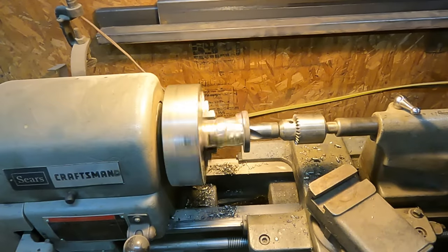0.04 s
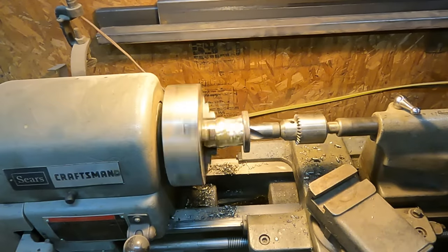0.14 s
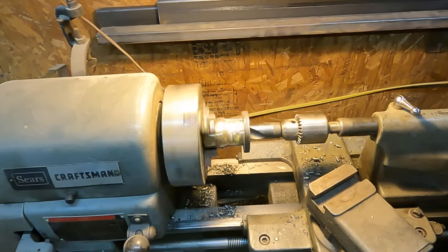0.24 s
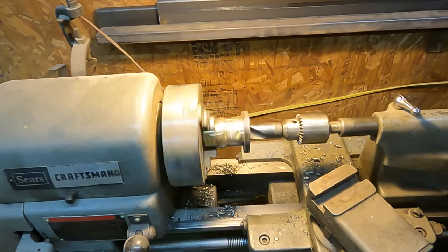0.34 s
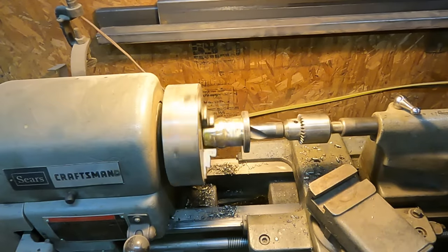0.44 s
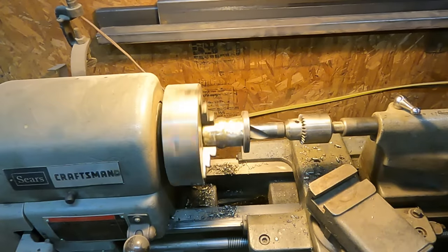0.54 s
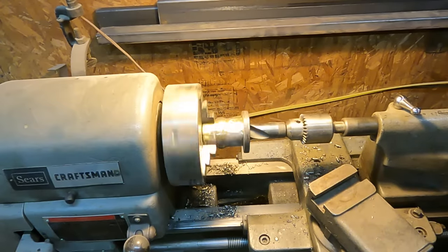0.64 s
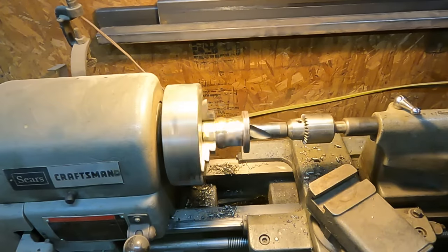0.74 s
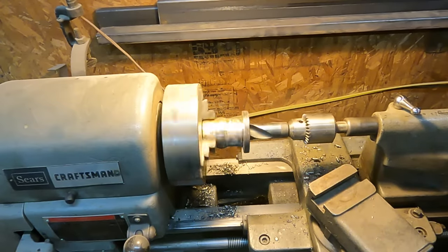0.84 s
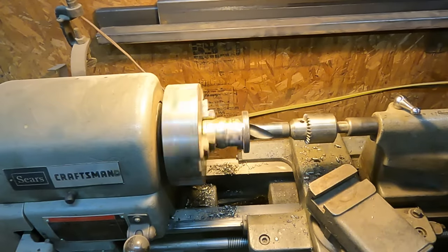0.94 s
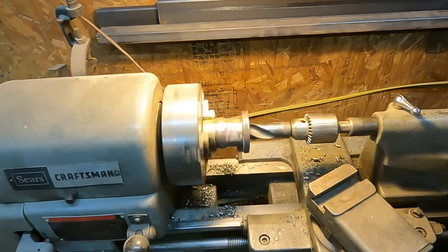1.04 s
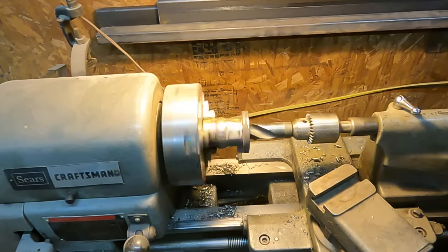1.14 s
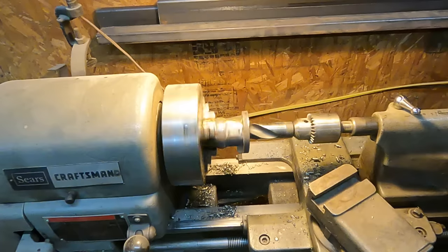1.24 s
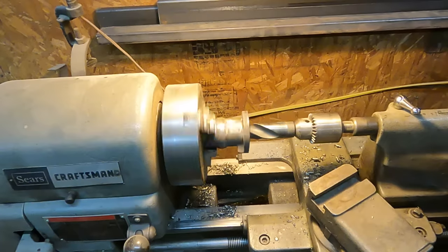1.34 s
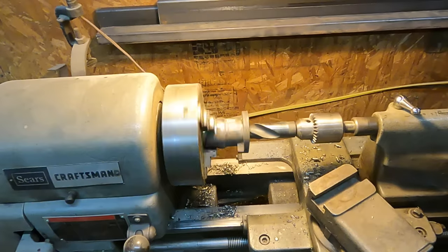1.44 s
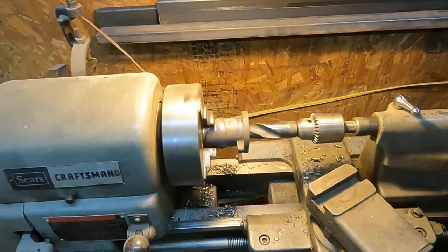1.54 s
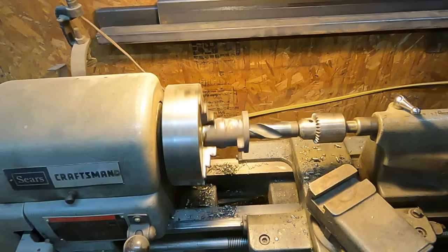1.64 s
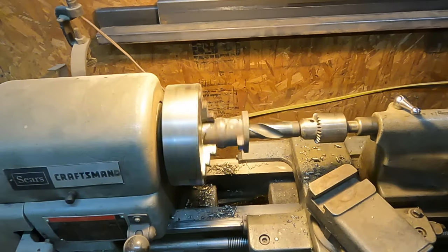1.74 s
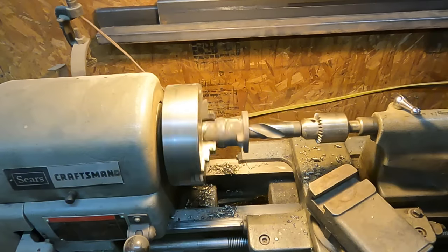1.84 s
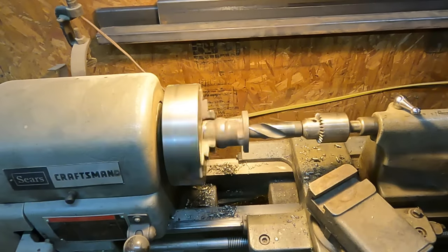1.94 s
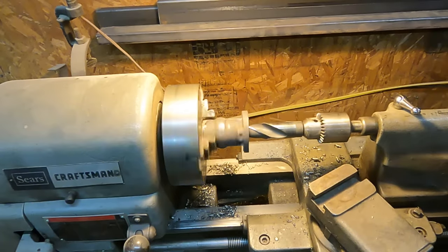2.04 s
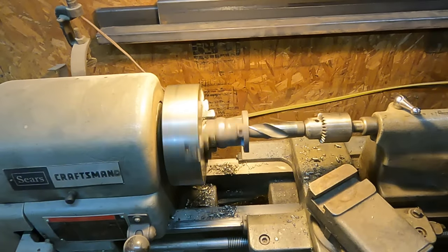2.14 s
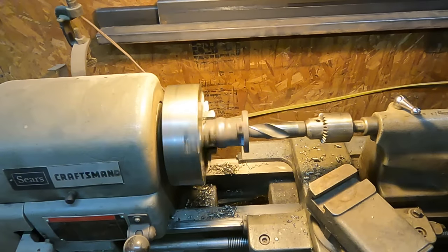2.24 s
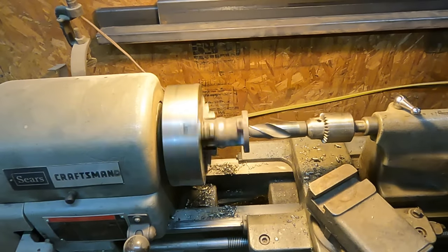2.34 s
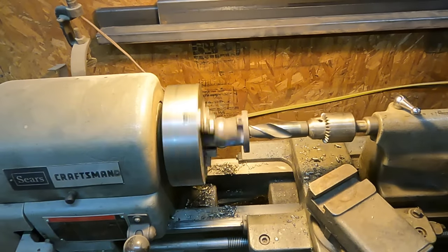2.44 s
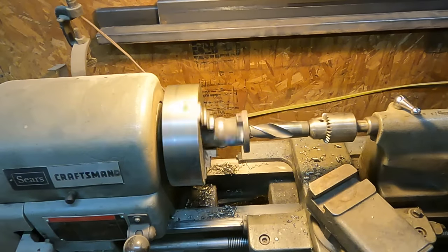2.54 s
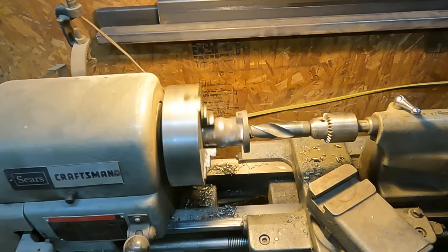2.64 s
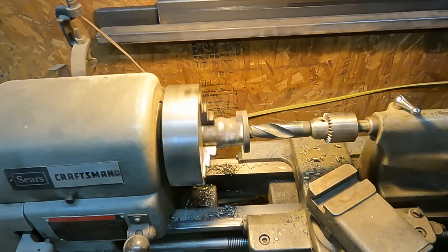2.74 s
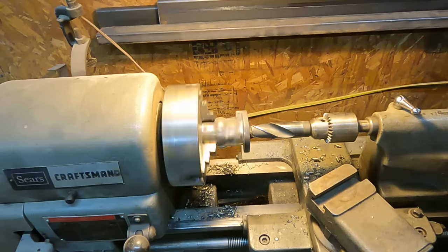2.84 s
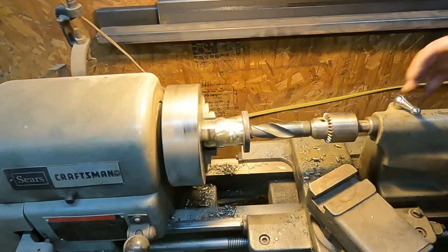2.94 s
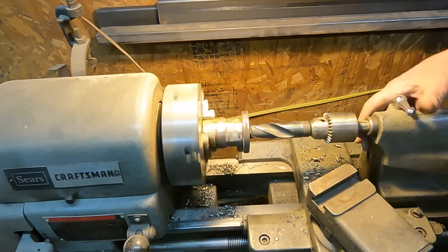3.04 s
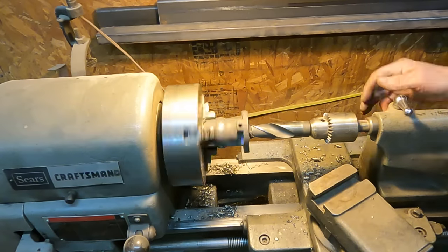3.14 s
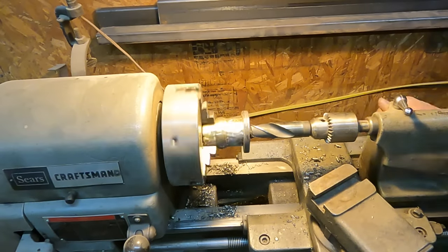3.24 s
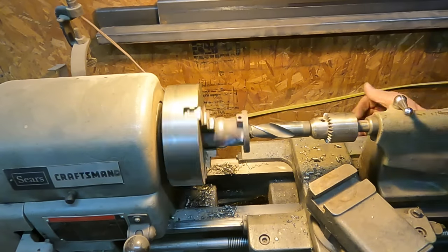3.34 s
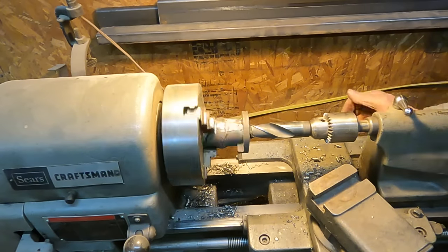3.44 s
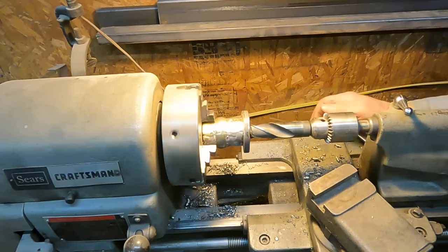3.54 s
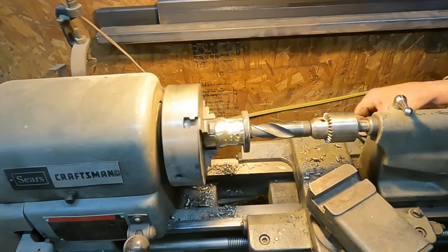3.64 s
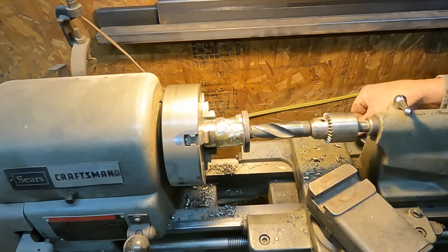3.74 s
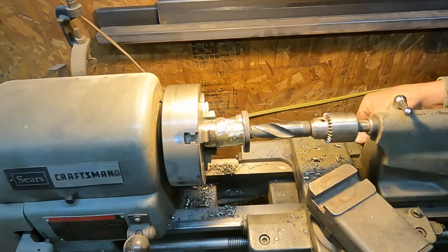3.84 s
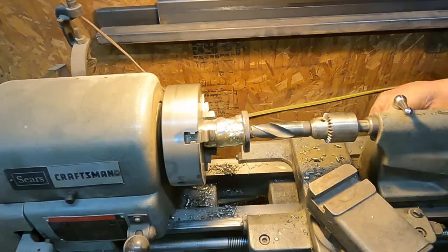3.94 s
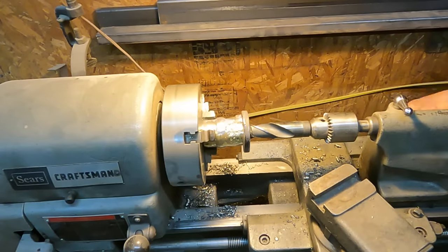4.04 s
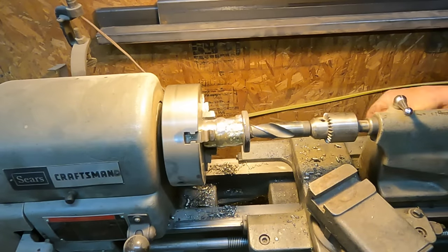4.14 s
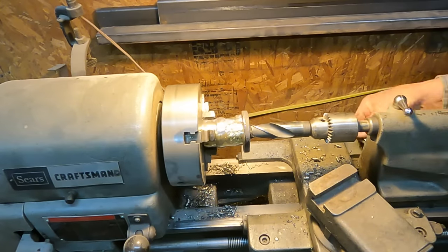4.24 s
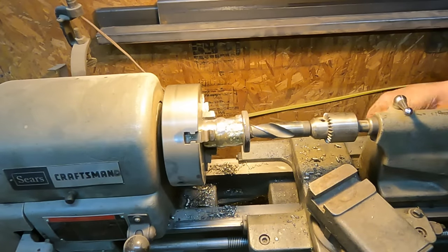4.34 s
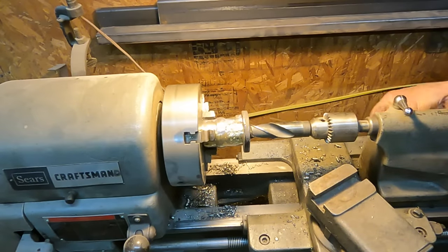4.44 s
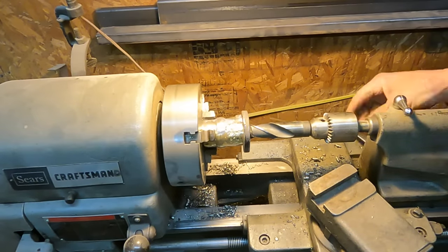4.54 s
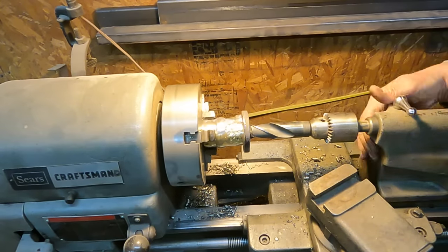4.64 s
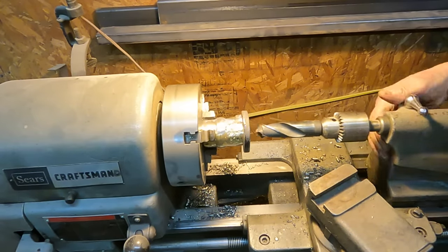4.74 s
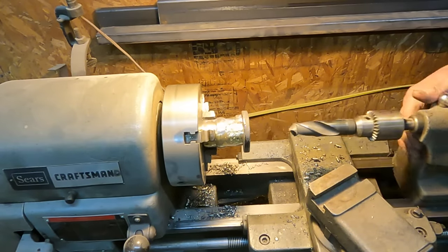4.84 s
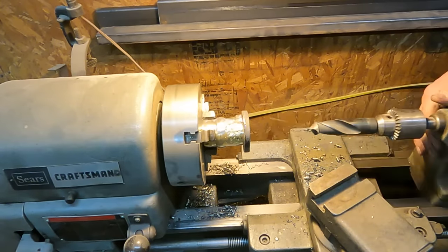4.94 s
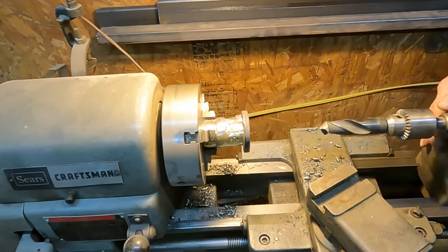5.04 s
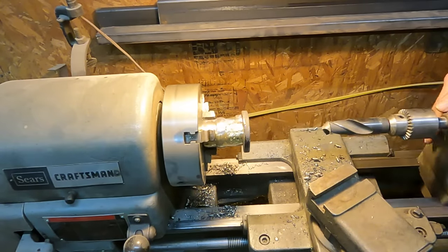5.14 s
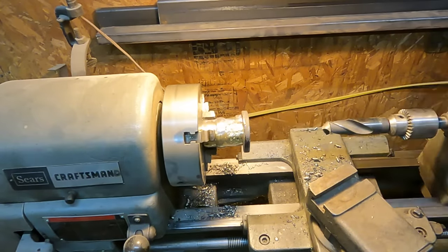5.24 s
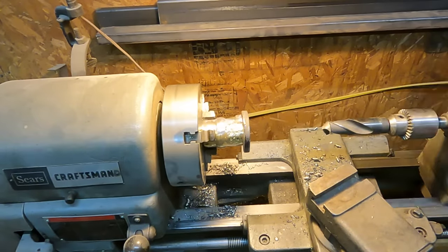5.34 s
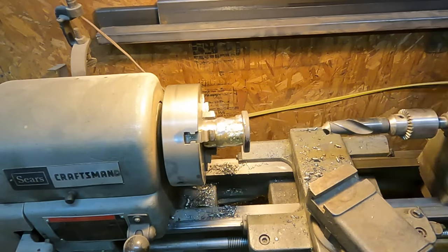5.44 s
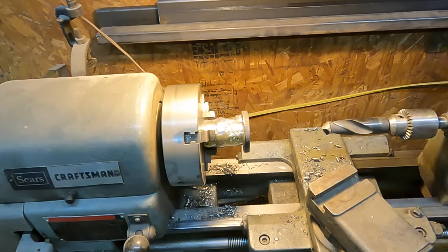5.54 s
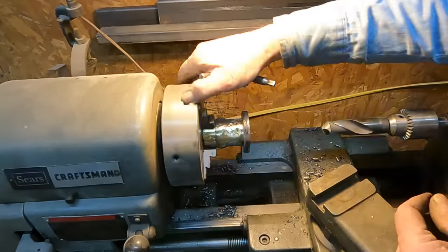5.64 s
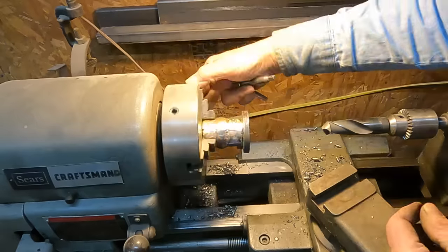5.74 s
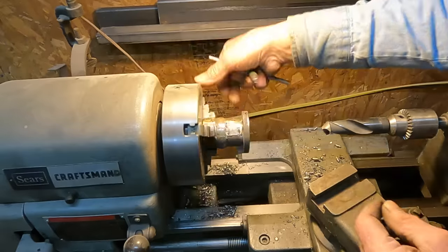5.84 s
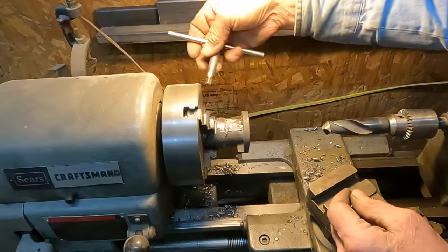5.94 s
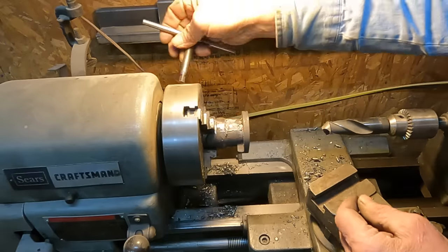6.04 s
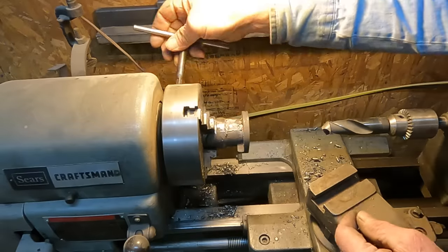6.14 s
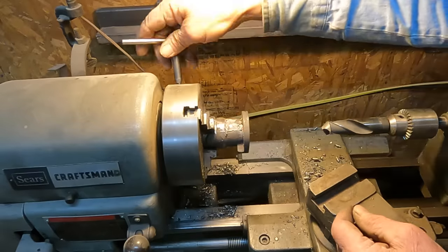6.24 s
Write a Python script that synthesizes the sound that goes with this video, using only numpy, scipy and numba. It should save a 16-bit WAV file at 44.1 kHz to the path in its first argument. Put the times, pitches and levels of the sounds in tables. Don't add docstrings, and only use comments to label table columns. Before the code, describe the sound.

Close mono sound of a lathe: brief high drill squeals, then regular scraping ticks and hissing metal chips over motor hum and low gear rumble. Switching off brings a heavy clunk and a softer belt clunk, with the iron bed ringing as the machine coasts down. Irregular bright crank clicks follow, then a quiet dry rub, faint bumps and a small cluster of key knocks, with a short workshop echo.

```python
import sys
import numpy as np
from scipy import signal
from scipy.fft import rfft, irfft, next_fast_len
from scipy.io import wavfile
from scipy.ndimage import uniform_filter1d
from numba import njit

SR = 44100
rng = np.random.default_rng(int(sys.argv[2]) if len(sys.argv) > 2 else 0)


def volts_from_decibels(level):
    exponent = np.asarray(level, float) / 20
    return 10 ** exponent


def to_wav(s):
    ch = np.atleast_2d(s).T
    pcm = np.round(np.clip(ch, -1, 1) * 32767)
    wavfile.write(sys.argv[1], SR, pcm.astype(np.int16))


N = 278271
TIME = np.arange(N) / SR
SWITCH_S = 2.883


def unit(x):
    return x / np.sqrt(np.mean(x ** 2))


def smooth(x, size):
    return uniform_filter1d(uniform_filter1d(x, size), size)


def colour(x, spectrum, peaks=()):
    size = next_fast_len(len(x))
    hz = np.maximum(np.arange(size // 2 + 1) * SR / size, 1)
    points = np.array(spectrum)
    db = np.interp(np.log(hz), np.log(points[:, 0]), points[:, 1], -90, -90)
    for centre, width, top in peaks:
        db += top / (1 + (2 * (hz - centre) / width) ** 2)
    return unit(irfft(rfft(x, size) * volts_from_decibels(db), size)[:len(x)])


def passband(x, kind, hz, order=2):
    return signal.sosfilt(signal.butter(order, hz, kind, fs=SR, output="sos"), x)


def walk(rate_hz):
    hold = int(SR / rate_hz)
    goals = np.repeat(rng.standard_normal(N // hold + 1), hold)
    return unit(smooth(goals, hold)[:N])


def grit(spread_db):
    return rng.standard_normal(N) * volts_from_decibels(spread_db * np.minimum(rng.exponential(size=N), 5))


def add(out, s, sound):
    i = int(s * SR)
    out[i:i + len(sound)] += sound[:N - i]


def fade(t, t60):
    return np.exp(-np.log(1000) * t / t60)


def ring(t, hz, t60):
    return np.sin(2 * np.pi * hz * t) * fade(t, t60)


# start_s, length_s, first_pitch_hz, last_pitch_hz, level_db
SQUEAKS = [(0.0253, 0.0045, 5300, 5250, -11), (.030, 0.0031, 5600, 5700, -11),
           (0.0331, 0.0022, 4700, 5100, -5.5), (.0345, 0.0066, 5680, 5870, 9.5),
           (0.126, 0.0075, 5200, 4900, -14), (0.131, 0.0088, 4470, 4530, -8),
           (0.136, 0.0067, 4680, 5670, 10), (0.1962, 0.0066, 5920, 4170, -3),
           (0.2017, 0.009, 4300, 4180, -9), (0.228, 0.0086, 4500, 4200, -13.5),
           (0.231, 0.0074, 4260, 3870, -10), (0.2378, 0.0059, 4730, 5280, -3),
           (0.2396, 0.012, 5560, 5730, 10), (.335, 0.0051, 5450, 3810, -16),
           (0.3437, 0.01, 5510, 5770, 7.5), (0.351, 0.0048, 5750, 5220, -5), (0.451, 0.004, 6800, 6160, 1),
           (0.453, 0.0075, 6280, 6300, -9), (0.541, 0.0053, 4600, 3550, -19)]


def squeaks():
    out = np.zeros(N)
    for s, length, first_hz, last_hz, db in SQUEAKS:
        u = np.linspace(0, 1, int(length * SR))
        pitch_shake, level_shake = uniform_filter1d(rng.standard_normal((2, 600)), 50)[:, :len(u)]
        hiss = rng.standard_normal(len(u))
        hz = first_hz + (last_hz - first_hz) * (1 - (1 - u) ** 3)
        octave = volts_from_decibels(8.5 - 18 * np.abs(hz - 4804) / 1000)
        phase = 2 * np.pi * np.cumsum(hz * (1 + 0.13 * (pitch_shake - pitch_shake.mean()))) / SR
        phase += (0.39 if last_hz < first_hz else 0.12) * unit(smooth(hiss, 34))
        rise = np.sin(np.pi / 2 * np.minimum(u / 0.4, 1))
        stop = np.sin(np.pi / 2 * np.minimum((1 - u) / 0.25, 1))
        shape = (rise * stop) ** 1.2 * (1 + 0.72 * level_shake) * np.exp(-0.6 * u)
        if last_hz < first_hz - 200:
            shape *= 1 + 0.9 * smooth(hiss, 12)
        third = 0.21 * (last_hz < 4800) * np.sin(3 * phase)
        overtones = octave * (np.sin(2 * phase) + third + 0.011 * hiss)
        add(out, s, volts_from_decibels(db) * shape * (np.sin(phase) + overtones))
    return out


# pitch_hz, level_db (per Hz)
CUTTING_HISS = [(820, -9), (1400, 0.5), (1590, -10), (4070, -13.5), (4760, -15.5), (5390, -14),
                (9530, -21.5), (15200, -27.5), (16200, -53.5), (16700, -87.5)]
# start_s, level_db
TICKS = [(0.632, -25.5), (0.726, -30), (0.7737, -21), (0.846, -20), (0.945, -19.5), (1.0497, -15.5),
         (1.1543, -9.5), (1.2568, -10), (1.361, -7), (1.4642, -12.5), (1.5647, -17.5), (1.668, -35),
         (1.7847, -20), (1.889, -19.5), (1.993, -19.5), (2.0875, -18.5), (2.19, -23), (2.2916, -23),
         (2.503, -32), (2.6437, -44), (2.6906, -49), (2.732, -29), (2.936, -40)]


def ticks():
    out, t = np.zeros(N), np.arange(2048) / SR
    for s, db in TICKS:
        bumps = [(4200, 1200, 10), (5300, 900, 10 + 0.9 * db), (8800, 2000, 17.5 + 0.55 * db),
                 (13000, 7000, 4 + 0.6 * db)]
        scrape = colour(rng.standard_normal(len(t)), CUTTING_HISS, bumps)
        scrape *= (1 - np.exp(-t / 0.0006)) * (np.exp(-t / 0.0028) + 0.16 * np.exp(-t / 0.015))
        scrape = passband(scrape, "high", 1700)
        add(out, s - 0.001, volts_from_decibels(db + 1.5) * scrape)
        add(out, s + 0.029, volts_from_decibels(0.41 * db - 20) * scrape)
    return out


# start_s, level_db, pitch_hz, length_s
SWARF = [(0.642, -34, 3600, 0.01), (0.744, -35, 3950, 0.011), (0.843, -35, 4200, .012),
         (0.976, -29, 3000, .012), (1.083, -27.5, 3300, 0.011), (1.183, -23, 2870, 0.01),
         (1.262, -18, 2660, 0.0073), (1.286, -29, 3150, .015), (1.387, -28, 4300, .008),
         (1.469, -16, 2900, 0.0057), (1.4932, -20, 2800, 0.0092), (1.575, -28, 4000, .015),
         (1.596, -22, 2970, .008), (1.672, -33, 4000, .02), (1.698, -24, 2900, 0.0073),
         (1.798, -24, 2900, 0.013), (1.902, -30, 2900, 0.0093), (1.921, -29, 3300, .008),
         (2.001, -18, 2970, .006), (2.095, -27, 3800, .012), (2.206, -24.5, 2680, .012),
         (2.3, -28, 3250, 0.021), (2.33, -28, 3480, .008), (2.397, -33, 4000, 0.011),
         (2.431, -28.5, 2800, 0.0096), (2.51, -34, 3800, .02)]


def swarf():
    out, t = np.zeros(N), np.arange(4096) / SR
    width = 0.41
    for s, db, hz, length in SWARF:
        noise = rng.standard_normal(len(t)) * volts_from_decibels(1.96 * rng.exponential(size=len(t)))
        scrape = unit(passband(noise, "band", [hz * (1 - width / 2), hz * (1 + width)]))
        add(out, s - 0.002, volts_from_decibels(db) * scrape * (1 - np.exp(-t / 0.0013)) * np.exp(-t / length))
    return out


# pitch_hz, width_hz, level_db
BRIGHT = [(2400, 2500, 2.5), (4200, 250, 3.5), (5300, 64, 9.5), (7250, 630, 6), (9380, 1900, 5.5),
          (11300, 390, 2.5)]


def chips(load):
    hiss = colour(grit(3.6), CUTTING_HISS, BRIGHT) * volts_from_decibels(1.1 * walk(29.93))
    turn_s, catch_s = 0.1032, 1.352
    bite = np.exp(-((TIME - catch_s) / turn_s % 1) / 0.44)
    hiss *= volts_from_decibels(3 * (bite - bite.mean()))
    breaks = (rng.random(N) < 700 * bite / SR) * rng.standard_normal(N)
    breaks = signal.lfilter([1], [1, -0.992], np.abs(breaks)) * rng.standard_normal(N)
    breaks = colour(breaks, CUTTING_HISS, [(4000, 1500, 17), (2400, 1500, 3.8)])
    hiss += 0.65 * volts_from_decibels(-18 * np.maximum(TIME - 1.1, 0)) * breaks
    pause = np.zeros(N)
    for s, length, _, _, db in SQUEAKS:
        if db > 3:
            pause += (TIME > s) * np.exp(-np.abs(TIME - s - length) / 0.026)
    return hiss * volts_from_decibels(-16.5 * pause - 31.5 + 0.79 * load)


# multiple of the mains pitch, level_db
HUM_LINES = [(4, -40), (8, -34.5), (12, -34), (13, -39.5), (16, -26), (18, -39), (21, -40.5), (23, -43),
             (24, -42), (28, -53)]


def hum(load):
    mains_hz = 59.97
    belt_s, joint_s = 0.611, 1.379
    from_joint = (TIME - joint_s + belt_s / 2) % belt_s - belt_s / 2
    db = -26 + 0.96 * load - 1 * np.exp(-(from_joint / 0.041) ** 2)
    main = volts_from_decibels(db - 337 * np.maximum(TIME - SWITCH_S, 0))
    slow = uniform_filter1d(main, SR // 4)
    top = max(line_db for _, line_db in HUM_LINES)
    out = np.zeros(N)
    for multiple, line_db in HUM_LINES:
        phase = 2 * np.pi * (multiple * mains_hz * TIME + 0.027 * walk(22) + rng.random())
        strength = main * volts_from_decibels(1.3 * walk(10)) if line_db == top else slow * volts_from_decibels(walk(3.7))
        out += np.sqrt(2) * volts_from_decibels(line_db - top + 1) * strength * np.sin(phase)
    return out


# pitch_hz, level_db (per Hz)
RUMBLE = [(24, -87), (40, -33), (91, -41), (184, -15.5), (233, -18), (425, -13.5), (486, -6), (658, -3),
          (715, -2.5), (804, -4), (951, -1), (1570, -17), (2200, -17.5), (2860, -42), (4840, -120)]
# pitch_hz, width_hz, level_db
CASTING = [(248, 11, 1), (311.4, 76, 17.5), (381.7, 28, 12.5), (523.7, 78, 12), (1074, 190, 9)]


def gears(load):
    rumble = colour(grit(3), RUMBLE, CASTING) * volts_from_decibels(0.9 * walk(40))
    low = passband(rumble, "low", 830)
    rumble = low + (rumble - low) * volts_from_decibels(-19 * np.maximum(TIME - SWITCH_S, 0))
    return rumble * volts_from_decibels(-24 + load)


# start_s, level_db (of gear rumble)
LOAD = [(0.0, -23.5), (0.32, -33.5), (0.45, -35), (0.66, -33.5), (0.79, -31.5), (1.11, -26.5), (1.4, -24),
        (2.2, -23), (2.72, -24.5), (2.87, -24), (3.0, -27.5), (3.14, -21.5), (3.22, -32.5), (3.53, -33),
        (3.76, -52.5), (3.85, -52.5), (3.96, -62)]


def motor():
    s, db = np.array(LOAD).T
    load = np.interp(TIME, s, db, -150, -150) + 24
    return hum(load) + gears(load) + chips(load)


# peak_s, level_db, rise_s, fall_s, treble_db
CLUNKS = [
    (3.119, -12.5, 0.021, 0.017, -4.5),
    (3.134, -18.5, 0.0038, 0.045, -31),
    (3.306, -24, 0.0047, 0.06, -7.5),
    (5.73, -42, 0.0088, 0.042, -45),
    (5.83, -43, 0.011, 0.024, -35),
]
# pitch_hz, level_db, decay_s (by 60 dB)
BED = [(249.6, -19, 1.24), (293, -40, .6), (381, -27, .6), (620, -18, 0.2), (1040, -15, 0.31),
       (1270, -42, 0.18)]


def clunks():
    low, high = colour(grit(0.29), RUMBLE, CASTING), colour(grit(4.3), CUTTING_HISS, BRIGHT)
    out = np.zeros(N)
    for s, db, rise, fall, treble_db in CLUNKS:
        shape = np.exp(np.where(TIME < s, (TIME - s) / rise, (s - TIME) / fall))
        out += volts_from_decibels(db) * shape * (low + volts_from_decibels(treble_db) * high)
    t = TIME[:SR // 2]
    bent = t + 18 / BED[0][0] * 0.11 * (1 - np.exp(-t / 0.11))
    bed = sum(volts_from_decibels(db) * ring(bent, hz, t60) for hz, db, t60 in BED)
    bed *= (1 - np.exp(-t / 0.0049)) / (1 + (t / 0.35) ** 12) * volts_from_decibels(2 * walk(25)[:len(t)])
    add(out, CLUNKS[0][0] - 0.018, bed)
    return out


# pitch_hz, level_db (per Hz)
SHOP = [(24, -83), (40, -44.5), (129, -24), (175, -38.5), (325, -0.5), (425, -12), (538, -2), (1070, -12),
        (1830, -26.5), (2200, -24), (2860, -63), (4840, -120)]


def knocks(table, crack_spectrum, modes=(), ring_cycles=200, tail=0.018, snap=0.29, crack_s=0.0057):
    out, t = np.zeros(N), np.arange(8192) / SR
    for s, db, hz, ring_db, thud_db in table:
        crack_noise, flutter_noise, thud_noise = rng.standard_normal((3, len(t)))
        body = np.exp(-t / crack_s / volts_from_decibels(0.16 * ring_db))
        crack_shape = snap * np.exp(-t / 0.00027) + body + tail * np.exp(-t / 0.015)
        crack = colour(crack_noise, crack_spectrum) * crack_shape
        push_s = 1 / SR
        if modes:
            hz = min((mode[0] for mode in modes), key=lambda mode_hz: abs(mode_hz - hz))
            push_s = 0.003 * np.clip((-19 - db) / 3, 0.01, 1)
        push = 1 - np.exp(-(t + 1 / SR) / push_s)
        flutter = 1 + (1.24 if hz < 6600 else 0.6) * unit(uniform_filter1d(flutter_noise, 70))
        own = flutter * ring(t, hz, ring_cycles / hz * (hz / 5000) ** 1.7)
        part = np.zeros(len(t))
        for mode_hz, mode_db, t60 in modes:
            level_shift, pitch_shift = rng.standard_normal(2)
            part += volts_from_decibels(mode_db + 3.9 * level_shift) * ring(t, mode_hz * (1 + 0.00071 * pitch_shift), t60)
        thud = colour(thud_noise, SHOP, [(1354, 610, 17), (642, 180, 3.2)])
        thud *= (t / 0.013) * np.exp(1 - t / 0.014)
        blow = 0.36 * crack + volts_from_decibels(ring_db) * own + flutter * part + volts_from_decibels(thud_db - db - 12) * thud
        add(out, s, volts_from_decibels(db) * push * blow)
    return out


# start_s, level_db, ring_pitch_hz, ring_db, thud_db
CRANK = [(3.5933, -4.5, 14570, -12, -45), (3.6099, -10, 11150, -0.5, -30), (3.627, -11.5, 7340, -10.5, -34),
         (3.7456, -9, 11100, -15, -32), (3.882, -36, 4510, -14, -48), (3.91, -41, 11100, -7, -44),
         (3.9645, -34, 4540, 4, -60), (3.9739, -6.5, 10680, -9.5, -44), (3.9826, -19, 10700, -18, -37.5),
         (4.0498, -21, 11300, -34, -47), (4.0862, -19, 11100, -27, -55), (4.1004, -10.5, 10680, -27, -30),
         (4.2466, -4, 14000, -10, -30), (4.2542, -6.5, 4630, -29, -31.5), (4.3312, -4.5, 10680, -10, -35),
         (4.39, -18, 13950, -30, -36.5), (4.5158, -23, 4240, -19, -32.5), (4.523, -20.5, 4430, -7.5, -35),
         (4.5693, -2.5, 11170, -4.5, -42), (4.5788, -6.5, 14570, -20, -31)]
# pitch_hz, level_db (per Hz)
CRANK_CRACK = [(530, -43.5), (900, -16.5), (3090, -7.5), (3490, -9), (4570, -1.5), (8830, -6.5),
               (11000, -1), (12400, -10), (14400, -17), (16700, -49)]
HANDLE_HZ = [1390, 4480, 5400, 6900, 7250, 7700, 10680, 11150, 13950, 14570]
# level_db, decay_s (by 60 dB)
HANDLE = [(-28, 0.099), (-21, 0.045), (-42, 0.043), (-20.5, 0.039), (-24, 0.036), (-26, 0.032), (-48, 0.12),
          (-41, 0.061), (-31, 0.056), (-37, 0.036)]


def crank():
    modes = [(hz, db, t60) for hz, (db, t60) in zip(HANDLE_HZ, HANDLE)]
    return knocks(CRANK, CRANK_CRACK, modes)


# start_s, level_db, ring_pitch_hz
TAPS = [(0.07, -21.5, 5730), (0.1097, -21, 5570), (3.353, -19, 4070), (3.468, -37, 5640),
        (3.491, -34, 7250), (3.693, -37, 2930), (4.411, -40, 2340), (4.4514, -36, 2400), (4.47, -44, 4500),
        (5.1136, -42.5, 7020), (5.249, -67, 6760)]
# pitch_hz, level_db (per Hz)
TAP_CRACK = [(880, -57), (1500, -16.5), (3320, -7.5), (4320, 2), (4930, -44), (5500, -8), (6150, -10.5),
             (14600, -23), (16700, -59)]


def taps():
    table = [(s, db, hz, -8, -40 + 0.25 * (db + 30)) for s, db, hz in TAPS]
    return knocks(table, TAP_CRACK, ring_cycles=220, tail=0.93, snap=0.05, crack_s=0.0063)


# start_s, level_db, ring_pitch_hz, ring_db, thud_db
KEY = [
    (6.0452, -10.5, 4000, -18, -32),
    (6.0518, -26, 3440, -11, -49),
    (6.1173, -20.5, 3760, -6.5, -26.5),
    (6.1235, -10, 3600, -23, -44),
    (6.1385, -27, 2950, -6, -49),
    (6.2092, -19, 3920, -12, -28),
    (6.2213, -27.5, 3860, -6, -47),
    (6.2887, -36, 4720, -8, -46),
    (6.2935, -34.5, 3530, 2.5, -26),
]
# pitch_hz, level_db (per Hz)
KEY_CRACK = [(530, -28), (900, -12), (1450, -35), (2220, -53), (2700, -2), (3760, -2), (5900, -4.5),
             (7270, 0), (11000, -3), (14900, 0), (16700, -3)]


def chuck_key():
    return knocks(KEY, KEY_CRACK, ring_cycles=110, tail=0.13, snap=0.68, crack_s=0.0046)


# start_s, pitch_hz, level_db,
# decay_s (by 60 dB)
PINGS = [(3.353, 4480, -18, 0.035), (3.353, 4200, -35, 0.5), (3.352, 5530, -23, 0.041),
         (3.353, 7250, -25, .04), (3.466, 5600, -36, 0.046), (3.466, 7250, -31, .04),
         (3.488, 5620, -36, .04), (3.489, 7250, -34, .08), (3.595, 2960, -19, 0.025),
         (3.612, 4540, -23, .05), (3.625, 1890, -23, 0.047), (3.746, 3010, -25, 0.028),
         (3.746, 4500, -27, .04), (3.909, 3050, -47, .06), (3.914, 2500, -47, 0.087),
         (3.973, 1920, -21, 0.029), (3.977, 1463, -39, 0.42), (3.978, 3760, -38, 0.14),
         (4.049, 3060, -36, .03), (4.086, 4600, -38, .03), (4.086, 3100, -36, .03),
         (4.099, 1110, -25.5, 0.039), (4.102, 1393, -42, 0.38), (4.12, 4450, -42, .15),
         (4.247, 3090, -22, 0.052), (4.248, 4670, -23, 0.051), (4.25, 1400, -40, 0.26),
         (4.331, 4460, -10, 0.038), (4.332, 3020, -27, 0.031), (4.333, 2010, -28, 0.049),
         (4.41, 2320, -29, 0.037), (4.411, 3500, -31, .03), (4.416, 4470, -39, 0.14),
         (4.451, 2350, -28.5, 0.028), (4.451, 3450, -30.5, .03), (4.524, 4460, -31, 0.05),
         (4.57, 3080, -22, 0.061), (4.571, 5400, -17.5, 0.061), (4.578, 4680, -21, 0.059),
         (4.58, 1150, -28, 0.067), (4.589, 506, -34, .1), (3.595, 11150, -16, 0.1),
         (3.594, 14300, -20, .09), (4.248, 14030, -20, 0.11), (4.248, 11150, -25, 0.11),
         (4.333, 11200, -23, 0.099), (4.391, 14100, -47, 0.12), (4.569, 11150, -28, 0.1),
         (4.57, 14570, -29, 0.11), (4.57, 14100, -25, .12),
         (6.046, 3650, -28.5, .05), (6.046, 9000, -33, .015), (6.055, 648, -29, 0.058),
               (6.118, 3520, -28, 0.065), (6.118, 9400, -32, 0.014), (6.127, 620, -43, 0.089),
               (6.128, 1473, -39, 0.12), (6.138, 3000, -46, .07), (6.194, 3700, -42, 0.072),
               (6.21, 3740, -24.5, 0.042), (6.21, 4800, -29, 0.036), (6.22, 7140, -23, .015),
               (6.224, 568, -25.5, 0.064), (6.293, 2670, -36, .05), (6.294, 1160, -33, .06),
               (6.298, 620, -29, .1), (6.302, 3740, -37.5, .04),
         (2.872, 870, -19, 0.085), (2.949, 295, -21, 0.17), (3.01, 290, -23, 0.17),
                 (3.125, 1458, -22, .25), (3.17, 584, -20, 0.24), (3.21, 378.3, -27.5, 0.97),
                 (3.3, 1074, -23.5, 0.31), (3.3, 910, -23, 0.11), (3.305, 328, -22.5, 0.34),
                 (3.975, 10680, -32, 0.16), (4.101, 10680, -36, 0.11), (4.333, 14000, -33, .12),
                 (3.519, 527, -31, 0.21), (5.607, 304, -40, 0.12), (5.655, 310, -48, .08),
                 (5.725, 334, -40, .15), (5.74, 537, -33, 0.1), (5.82, 542, -33.5, .1),
                 (5.839, 290, -48, .08)]


def pings():
    out, t = np.zeros(N), np.arange(16384) / SR
    for s, hz, db, t60 in PINGS:
        beat, wander = smooth(rng.standard_normal((2, len(t))), 70)
        rough = 0.92 * np.clip(1.1 - hz / 6600, 0.1, 0.8)
        tone = np.sin(2 * np.pi * hz * t + rough * unit(wander)) * fade(t, t60)
        swell = 1 - np.exp(-t * hz / 2.1)
        add(out, s, volts_from_decibels(db) * (1 + rough * unit(beat)) * swell * tone)
    return out


# start_s (of full force),
# hold_s, rub_db, murmur_db
MOVES = [(3.612, 0.032, -40, -39.5), (3.7, 0.11, -48, -50), (3.996, 0.16, -51.5, -63),
         (4.29, 0.13, -44, -47), (4.583, 0.075, -48, -47), (4.825, 0.29, -43, -67),
         (5.115, 0.037, -49.5, -52), (5.213, 0.07, -51.5, -69), (5.315, 0.11, -53, -52.5),
         (5.431, .12, -55.5, -53.5), (5.622, 0.04, -47, -48), (5.672, 0.28, -41.5, -47),
         (5.732, 0.34, -48, -42), (6.19, 0.027, -57, -49), (6.276, 0.036, -56, -45.5)]


def effort(rest_db, column):
    db = np.full(N, float(rest_db))
    for row in MOVES:
        since = TIME - row[0]
        early, held, late = np.maximum(-since, 0), np.maximum(since, 0), np.maximum(since - row[1], 0)
        db = np.maximum(db, row[column] - 211 * early - 15 * held - 150 * late)
    return volts_from_decibels(db)


# pitch_hz, level_db (per Hz)
SLIDE = [(820, -17), (1400, -8.5), (1810, -16.5), (2530, -9), (3280, -13.5), (5970, -16), (7350, -17.5),
         (14700, -22), (16200, -45), (16700, -71.5)]
# pitch_hz, width_hz, level_db
WAYS = [(2190, 170, -1), (2820, 400, 0.5), (4600, 220, 6), (5480, 520, 7.5), (6560, 150, 9),
        (7250, 440, 11), (9100, 540, 7.5)]


def rub():
    noise = grit(2.7) * volts_from_decibels(1.6 * walk(25))
    force = effort(-58.5, column=2)
    sing = np.clip(force / volts_from_decibels(-43.5), 0, 1)
    return force * (sing * colour(noise, SLIDE, WAYS) + (1 - sing) * colour(noise, SLIDE))


# a list of pitch_hz, level_db (per Hz), then its overall level_db
AIR = [(15, -68), (25, -19.5), (107, -13.5), (135, -3), (168, -8), (300, -6), (390, -48), (660, -120)], -72


def murmur():
    stir = effort(-58, column=3)
    low = colour(grit(4.2), SHOP, [(570, 750, 6.3)]) * volts_from_decibels(1.7 * walk(25))
    thin = passband(low, "high", 350, order=4)
    low = thin + (low - thin) * np.clip(stir / volts_from_decibels(-44.5), 0, 1) ** 1.1
    spectrum, air_db = AIR
    air_db = air_db + 10.5 - 5.5 * np.maximum(TIME - SWITCH_S, 0) + 1.2 * walk(3.7)
    air = colour(rng.standard_normal(N), spectrum) * volts_from_decibels(air_db)
    return low * stir + air * np.minimum(stir / volts_from_decibels(-52.5), 1) ** 1.2


def room_echo(sound):
    t = TIME[:SR // 2]
    noise = rng.standard_normal(len(t))
    dull = passband(noise, "low", 5200)
    walls = dull * fade(t, 0.39) + (noise - dull) * fade(t, 0.21)
    walls *= 1 - np.exp(-t / 0.002)
    return volts_from_decibels(-15.5) * signal.fftconvolve(sound, walls / np.sqrt(np.sum(walls ** 2)))[:N]


def scene():
    drill = squeaks() + ticks()
    hands = crank() + taps() + chuck_key()
    sharp = passband(drill + swarf() + hands, "high", 227, order=4) + clunks()
    sharp += passband(pings(), "high", 240, order=4)
    shank = volts_from_decibels(-0.5) * passband(drill, "high", 7800, order=4)
    mono = sharp + room_echo(sharp + shank) + motor() + rub() + murmur()
    return np.array([mono, mono])


@njit
def follow(x, attack, release):
    y, e = np.empty(len(x)), 0.
    for i in range(len(x)):
        e += (x[i] - e) * (attack if x[i] > e else release)
        y[i] = e
    return y


def band_limit(x):
    return signal.sosfilt(signal.butter(12, 16820, fs=SR, output="sos"), x)


def record(dry):
    ahead = np.abs(np.roll(dry[0], -80))
    heard = follow(ahead, 1 / (0.0015 * SR), 1 / (0.042 * SR))
    gain = np.maximum(heard / volts_from_decibels(-11.5), 1) ** -0.6
    soft = 1.228 * np.tanh(dry * gain / 1.396)
    cut = passband(passband(soft, "high", 63.5, order=1), "low", 15500, order=10)
    return band_limit(np.clip(cut, -0.97, 0.97))


dry = scene()
out = record(dry)
to_wav(out)
```